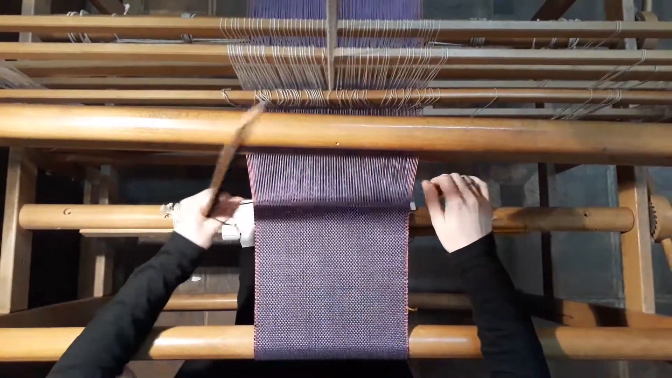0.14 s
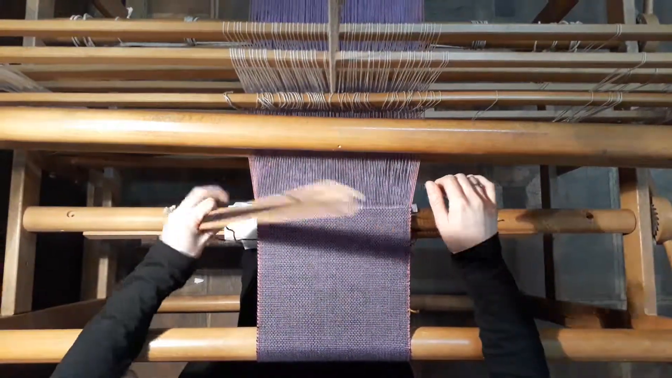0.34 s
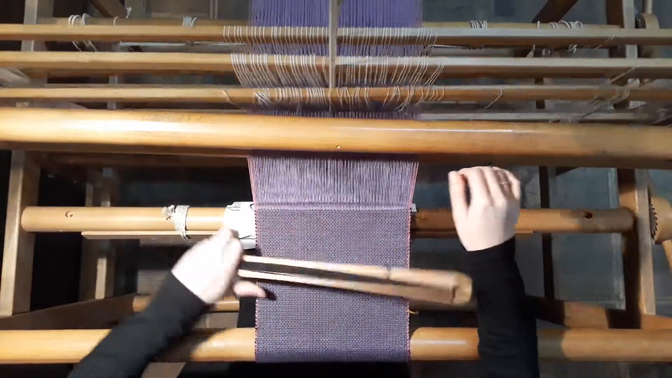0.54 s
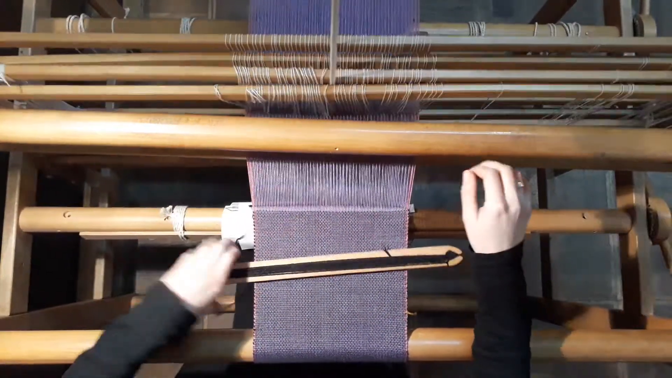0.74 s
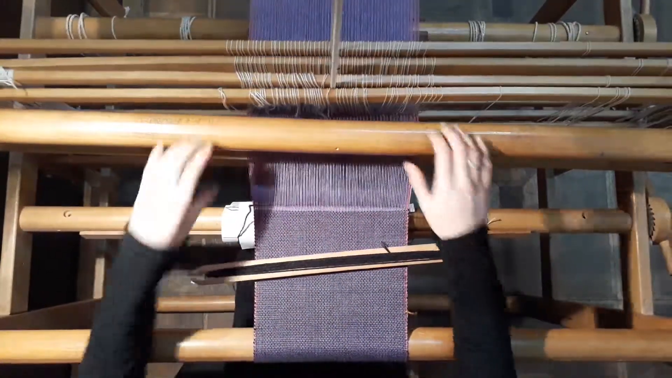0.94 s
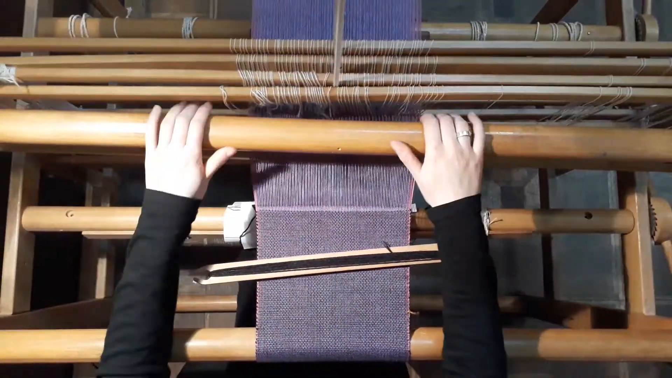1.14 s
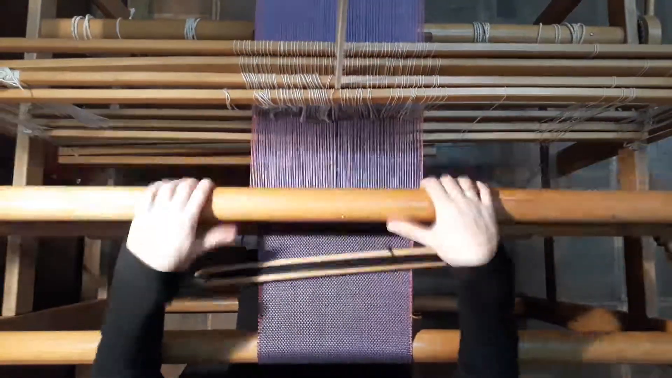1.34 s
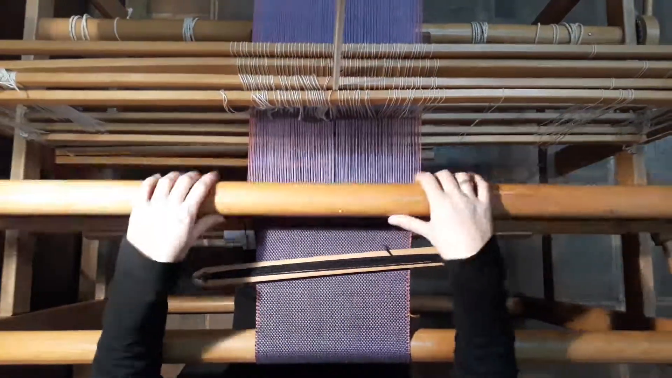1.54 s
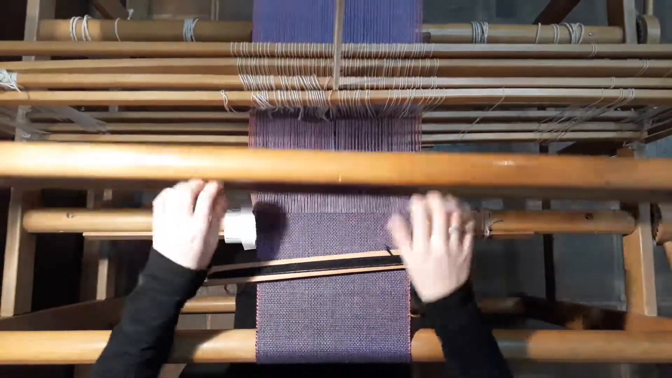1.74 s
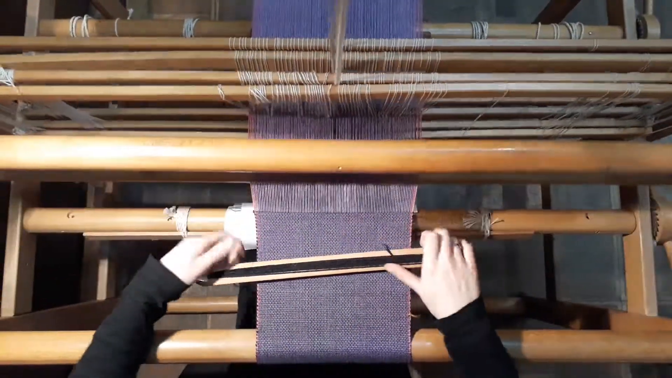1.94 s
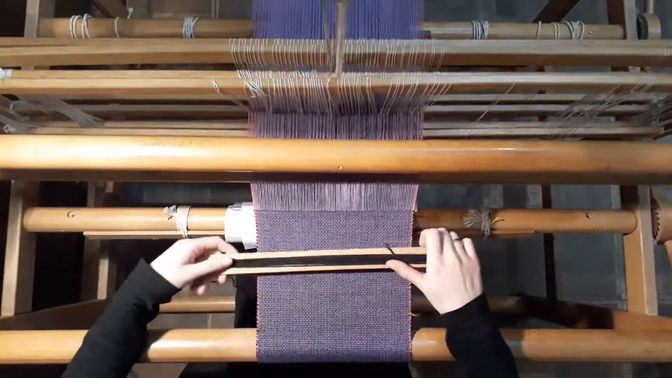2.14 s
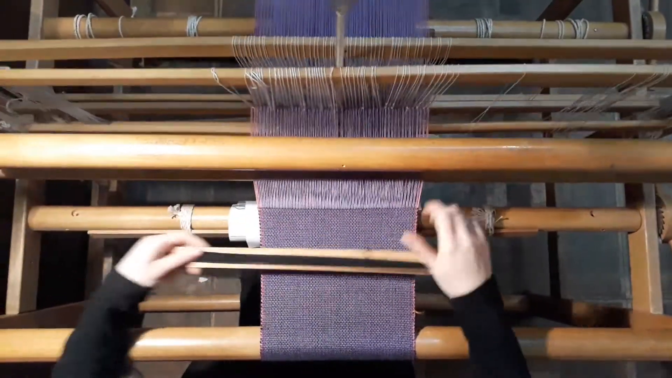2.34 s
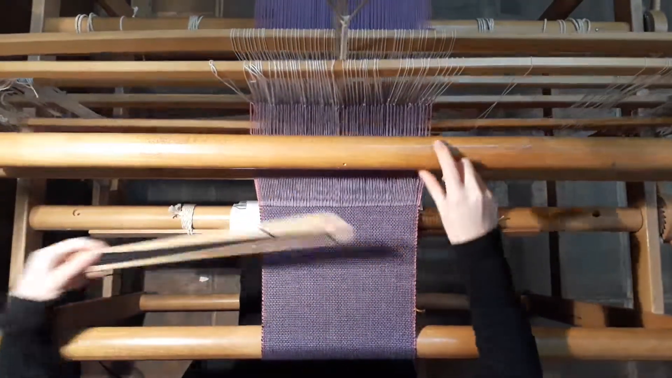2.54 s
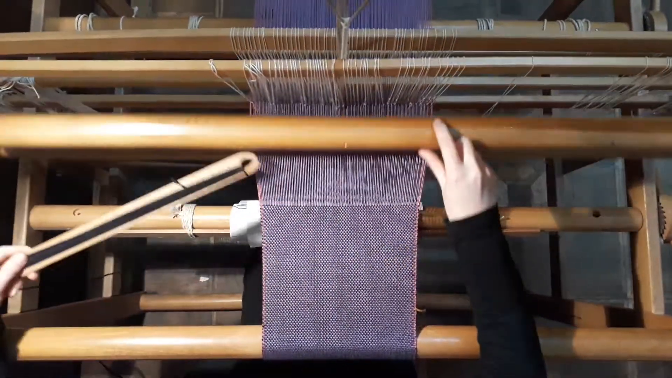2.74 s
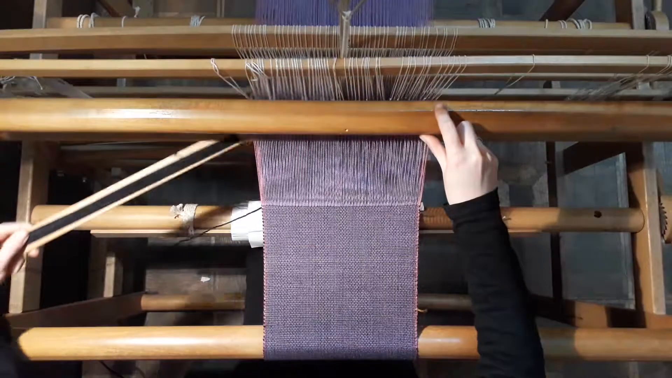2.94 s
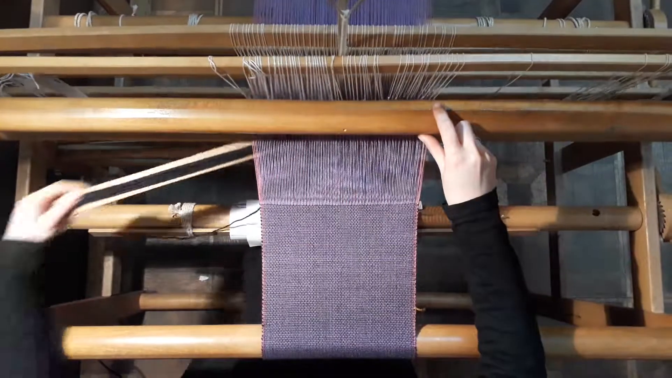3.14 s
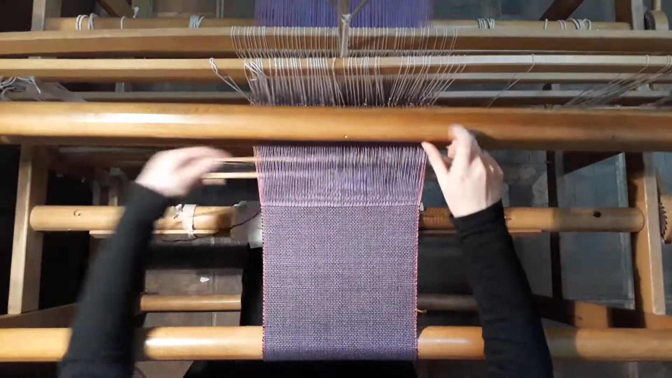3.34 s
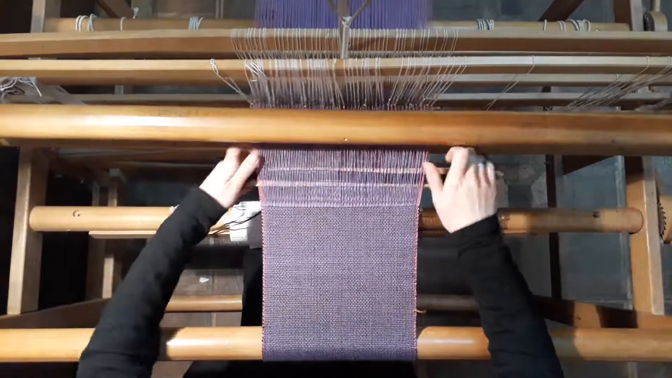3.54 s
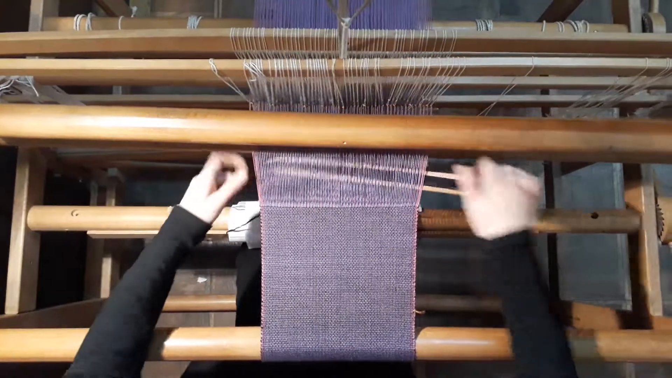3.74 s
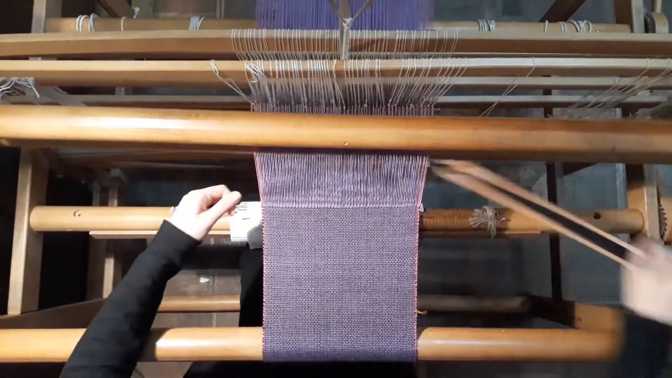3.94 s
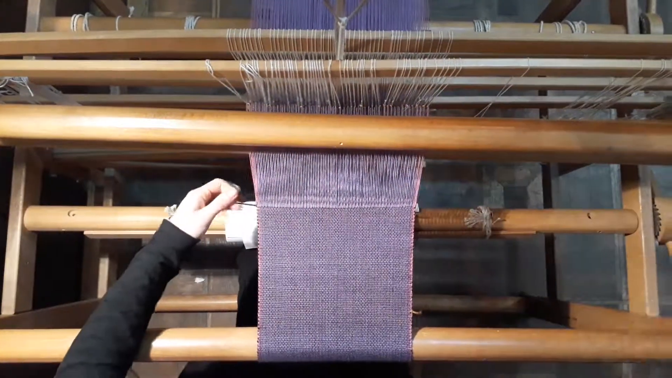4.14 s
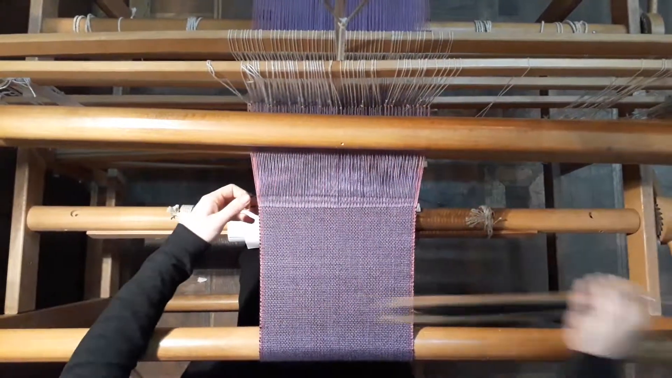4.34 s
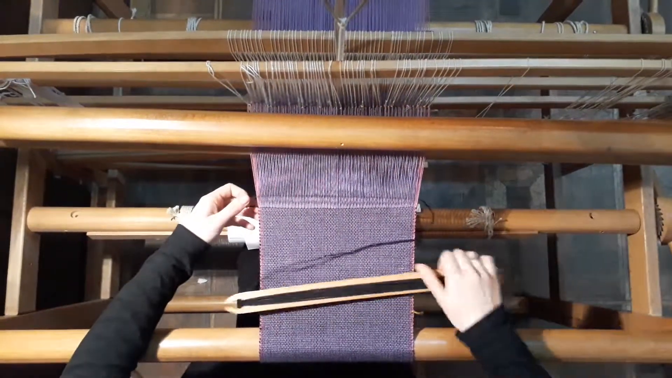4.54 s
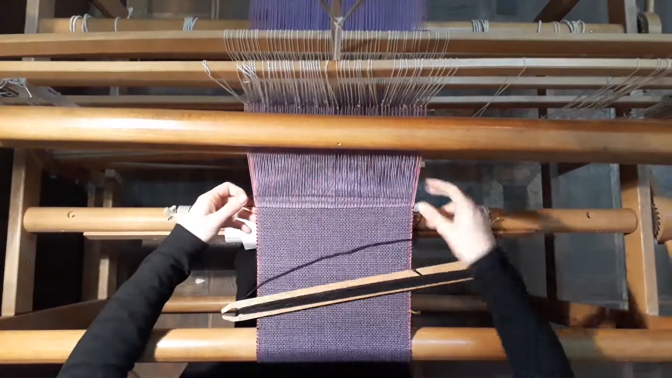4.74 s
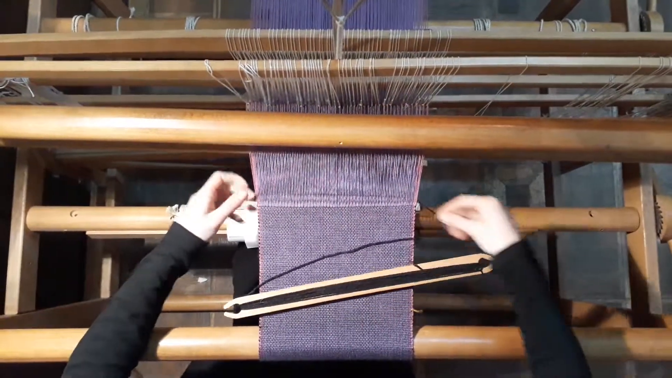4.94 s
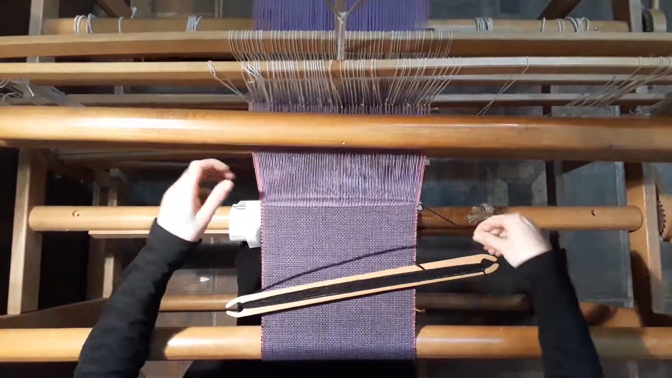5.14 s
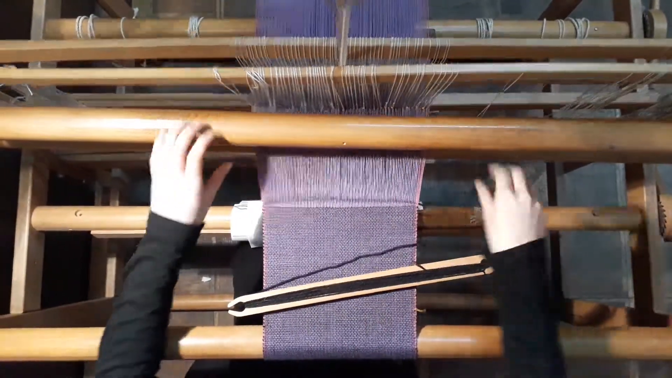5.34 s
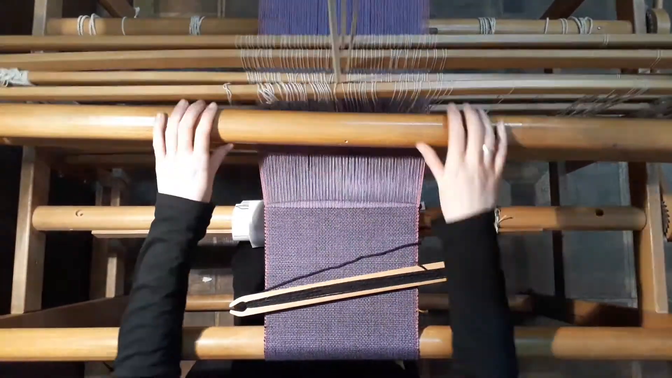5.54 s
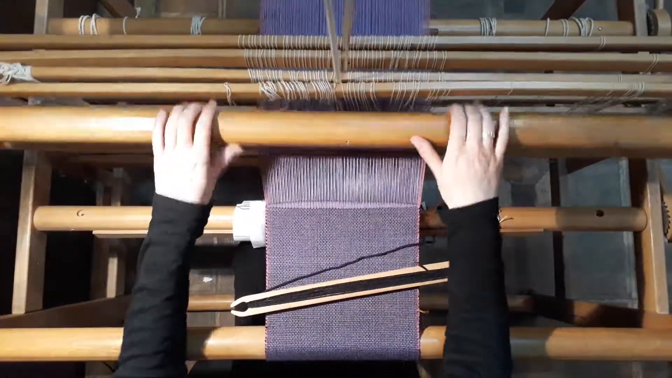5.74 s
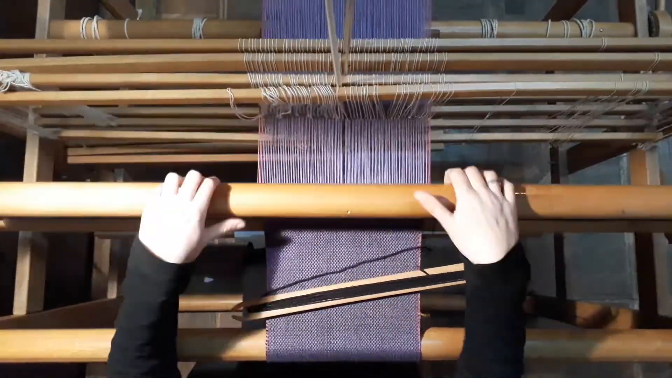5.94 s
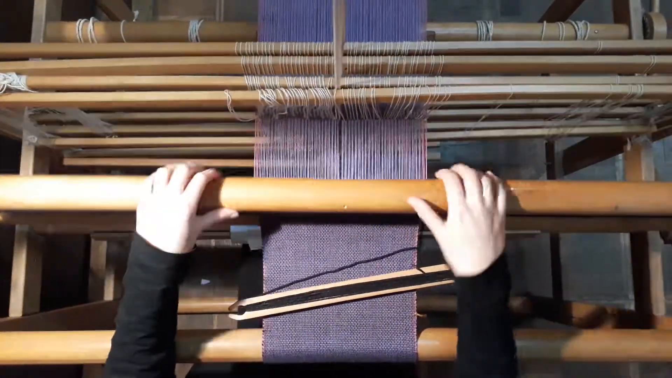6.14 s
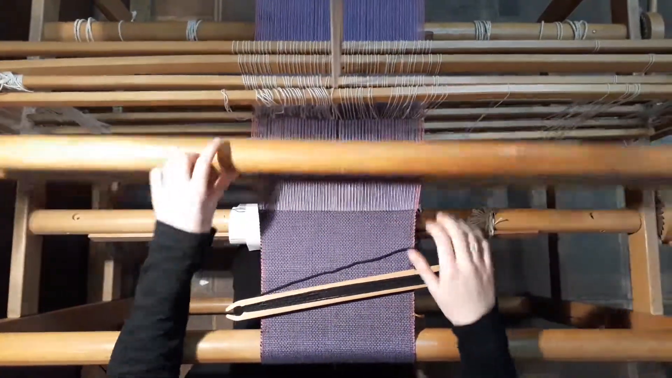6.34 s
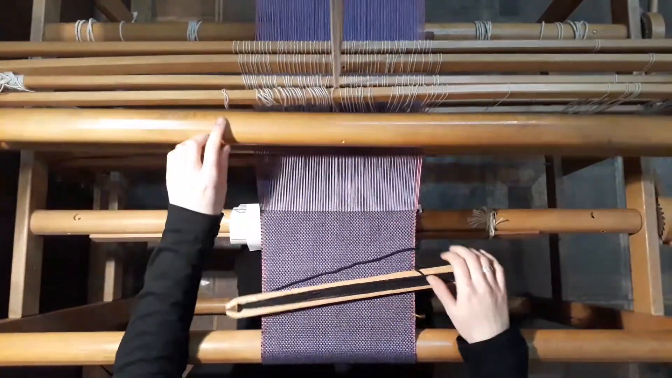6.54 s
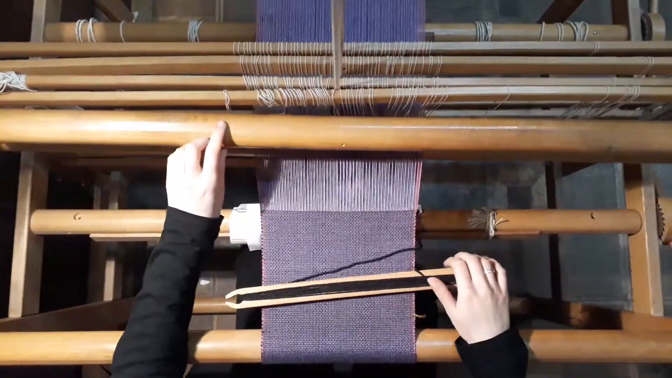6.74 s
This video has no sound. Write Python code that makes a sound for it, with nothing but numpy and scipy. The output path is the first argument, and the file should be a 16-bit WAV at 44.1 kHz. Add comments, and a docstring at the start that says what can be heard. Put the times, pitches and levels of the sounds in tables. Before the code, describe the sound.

A wooden floor loom is worked by hand, heard from just above the cloth in a bare room with a short echo. Around 0.5 seconds a stick shuttle ticks and scrapes over the threads, then the hanging shafts knock and rattle. At 1.4 seconds the beater scrapes along the warp and hits with a sharp crack and a low boom. More bright wooden knocks follow at 2 seconds. From 2.3 to 5.2 seconds it is quieter: the shuttle taps and slides, yarn rustles, the timber groans faintly at 3 seconds, and the shuttle lands on the cloth with a soft, dull slap at 4.5. From 5.4 seconds the shafts clatter loudly over a faint low grumble. The second beater stroke scrapes, cracks and booms at 6 seconds, and lighter knocks and rattles continue until about 6.8.

```python
"""A wooden floor loom weaving two picks by hand, the microphones just above the cloth in a bare room.
Twice the beater is pulled in: the reed scrapes along the threads, packs the weft, and the frame booms.
The treadles shift the hanging shafts, whose bars knock and rattle, and the loaded timber grumbles.
Close up, a stick shuttle taps and slides through the warp and is laid on the cloth with a soft slap."""
import sys
import numpy as np
from scipy import signal
from scipy.fft import rfft, irfft, next_fast_len
from scipy.io import wavfile
from scipy.ndimage import uniform_filter1d

SR = 44100
rng = np.random.default_rng(int(sys.argv[2]) if len(sys.argv) > 2 else 0)


def dump(signal):
    """Clip the signal to [-1, 1] and save it as 16-bit WAV at the path in sys.argv[1]."""
    limited = np.clip(np.atleast_2d(signal).T, -1, 1)
    pcm = np.round(limited * 32767).astype(np.int16)
    wavfile.write(sys.argv[1], SR, pcm)


N = 303408
TIME = np.arange(N) / SR


def amp(db):
    """Decibels to gain."""
    return 10 ** (np.asarray(db) / 20)


def unit(x):
    """Scales to rms 1."""
    return x / np.sqrt(np.mean(x ** 2) + 1e-20)


def at_peak(sound, db, window=88):
    """Scales a blow so that its loudest window of samples has this level."""
    return sound * amp(db) / np.sqrt(uniform_filter1d((sound ** 2).mean(0), window).max())


def panned(pan_db):
    """Left and right gains; positive pan_db leans left."""
    return amp(np.array([[pan_db], [-pan_db]]) / 2)


def add(mix, start_s, sound):
    """Mixes a stereo sound in at start_s."""
    part = mix[:, max(round(start_s * SR), 0):][:, :sound.shape[1]]
    part += sound[:, :part.shape[1]]


def read(points, hz):
    """Reads a table on a log-frequency axis."""
    f, value = np.transpose(points)
    return np.interp(np.log(hz + 1), np.log(f + 1), value)


def colour(x, db_at):
    """Filters by a function that gives dB for each frequency."""
    n = x.shape[-1]
    size = next_fast_len(n + 4096)
    return irfft(rfft(x, size) * amp(db_at(np.fft.rfftfreq(size, 1 / SR))), size)[..., :n]


def shaped(x, spectrum):
    """Filters x by a spectrum table, at rms 1."""
    return unit(colour(x, lambda f: read(spectrum, f)))


def hump(x, hz, below_db, above_db):
    """Filters by a broad hill around hz, its slopes in dB per octave."""
    def db_at(f):
        octaves = np.log2((f + 1) / hz)
        return -np.where(octaves < 0, below_db, above_db) * (np.sqrt(octaves ** 2 + .5) - np.sqrt(.5))
    return colour(x, db_at)


def swell(start_s, hold_s, db, rise_db_per_s, fall_db_per_s):
    """Gain over time: rises until start_s, holds, then dies away."""
    early, late = np.maximum(start_s - TIME, 0), np.maximum(TIME - start_s - hold_s, 0)
    return amp(db - rise_db_per_s * early - fall_db_per_s * late)


def together(gains):
    """Overlapping gestures add in power."""
    return np.sqrt(sum(gain ** 2 for gain in gains))


def swells(rows, rise_db_per_s, fall_db_per_s):
    """Gain over time of events that share one attack and release."""
    return together(swell(*row, rise_db_per_s, fall_db_per_s) for row in rows)


def grains(per_s, spread_db):
    """Random clicks of uneven size."""
    size = amp(spread_db * np.minimum(rng.exponential(1, N), 4))
    return size * rng.choice([-1, 1], N) * (rng.random(N) < per_s / SR)


# how alike a diffuse field is at the two microphones: freq_hz, coherence
COHERENCE = [(30, 1), (130, 0.993), (300, 0.92), (700, 0.6), (1300, 0), (16000, 0.1)]
def diffuse(pair):
    """Two unrelated channels become alike in the bass, as at a closely spaced pair."""
    n = pair.shape[-1]
    a, b = rfft(pair)
    same = np.clip(read(COHERENCE, np.fft.rfftfreq(n, 1 / SR)), 0, 1)
    mid, side = a * np.sqrt((1 + same) / 2), b * np.sqrt((1 - same) / 2)
    return irfft(np.array([mid + side, mid - side]), n)


def noise(n=N):
    """White noise reaching the pair from all sides."""
    return diffuse(rng.standard_normal((2, n)))


CONTACT_RISE_S = .0007
def contact(t, fade_s):
    """The dense, quickly damped crack at the point of impact."""
    return noise(len(t)) * np.exp(-t / fade_s) * (1 - np.exp(-t / CONTACT_RISE_S))


def ring(modes, t, detune):
    """One blow on a set of modes; each piece of wood is tuned a little differently."""
    hz, db, t60 = np.transpose(modes)[:, :, None]
    hz = hz * (1 + detune * rng.standard_normal(hz.shape))
    # the place of the blow decides how strongly each mode speaks
    strike = rng.uniform(0.71, 1, len(modes)) * np.exp(2j * np.pi * rng.random((2, len(modes))))
    partials = amp(db) * np.exp((2j * np.pi * hz - np.log(1000) / t60) * t)
    return (strike @ partials).real / np.linalg.norm(amp(db))


# decay of the bare room: freq_hz, t60_s
ROOM_DECAY = [(100, 0.68), (500, 0.67), (1400, 0.61), (3700, 0.56), (9000, 0.41), (16000, 0.26)]
def room(x, wet_db):
    """The diffuse echo off walls and floor, the treble dying first."""
    hz, t, bands = signal.stft(noise(SR), SR, nperseg=256)
    decay = np.exp(-np.log(1000) * t / read(ROOM_DECAY, hz)[:, None])
    tail = signal.istft(bands * decay, SR, nperseg=256)[1][:, :SR]
    tail *= 1 - np.exp(-(TIME[:SR] / 0.0016) ** 2)
    return amp(wet_db) * signal.fftconvolve(x, tail / np.linalg.norm(tail[0]), axes=1)[:, :N]


# room tone: freq_hz, relative_db
AIR_SPECTRUM = [(20, -20), (120, 7), (190, -7), (500, -17), (1000, -20.5), (4500, -27), (8000, -18),
                (10000, -23), (16000, -23)]
def room_tone(level_db=-59.5):
    """Faint low rumble and hiss all around the loom."""
    return amp(level_db) * shaped(noise(), AIR_SPECTRUM)


# the timber groans as the shuttle is pushed through and the yarn drawn tight: start_s, hold_s, level_db
GROAN_SWELLS = [(3.03, 0.11, -51), (5.14, 0.14, -61.5)]
def groans(pitch_hz=134, waver=0.066):
    """Wood rubbing on wood keeps one low note of the frame sounding, unsteady in pitch."""
    drift = unit(uniform_filter1d(rng.standard_normal(N), size=2000))
    note = unit(np.sin(2 * np.pi * np.cumsum(pitch_hz * (1 + waver * drift)) / SR))
    return swells(GROAN_SWELLS, rise_db_per_s=70, fall_db_per_s=42) * note


def resonance(x, hz, width_hz):
    """A resonance that follows the curve hz, with steep skirts."""
    turn = np.exp(2j * np.pi * np.cumsum(hz) / SR)
    pole = np.exp(-np.pi * width_hz / SR)
    return unit((turn * signal.lfilter([1], np.poly([pole, pole]), x / turn)).real)


# wood dragged over threads: start_s, length_s, level_db, first_hz, last_hz, width_hz
SHUTTLE_DRAGS = [(0.511, 0.23, -50, 960, 2380, 1880), (2.305, 0.44, -58, 825, 654, 950),
                 (3.363, 0.08, -53, 1100, 1000, 500), (2.95, .36, -59.5, 2520, 3150, 700)]
def shuttle_drags():
    """The shuttle skips from thread to thread; its ring glides as the free end changes length."""
    out = np.zeros((2, N))
    for start_s, length_s, db, first_hz, last_hz, width_hz in SHUTTLE_DRAGS:
        n = round(length_s * SR)
        skips = np.array([grains(per_s=350, spread_db=2.5)[:n] for _ in range(2)])
        scrape = diffuse(resonance(skips, np.linspace(first_hz, last_hz, n), width_hz))
        add(out, start_s, amp(db) * scrape * signal.windows.tukey(n, .5) * panned(2))
    return out + room(out, wet_db=-5)


# the taut cloth and its beam, just under the microphones: pitch_hz, relative_db, t60_s
CLOTH_MODES = [(92, 5, 0.17), (140, -6, 0.22), (300, 0, 0.08)]
def cloth_slap(start_s=4.55, level_db=-37.5, attack_s=0.0074):
    """The shuttle is laid down with a soft slap, and the cloth answers like a slack drum."""
    out, t = np.zeros((2, N)), TIME[:SR // 2]
    slap = hump(contact(t, fade_s=.04), hz=230, below_db=14, above_db=36)
    drum = ring(CLOTH_MODES, t, detune=0.0014)[0]
    bump = at_peak(np.array([drum, drum]), 0, window=400) + at_peak(slap, -7, window=400)
    bump *= 1 - np.exp(-t / attack_s)
    add(out, start_s, at_peak(bump, level_db, window=400))
    return out + room(out, wet_db=-6)


# rubbed yarn at close range: freq_hz, relative_db
YARN_SPECTRUM = [(400, -9), (1200, -13), (2500, -6.5), (4500, 0.5), (8000, 1), (10500, 1), (15500, -7.5)]
def rubbing(per_s, spread_db, release_s=0.011):
    """Fibres catch and let go in a fine crackle."""
    catches = signal.lfilter([1], [1, -np.exp(-1 / (release_s * SR))], grains(per_s, spread_db) ** 2)
    return shaped(np.sqrt(catches) * rng.standard_normal((2, N)), YARN_SPECTRUM)


# yarn, shuttle or reed drawn over the warp, to the right: fastest_s, run_up_s, run_out_s, level_db
WARP_SLIDES = [(.65, 0.22, 0.38, -44.5), (1.35, 0.16, 0.14, -44.5), (2.198, 0.59, 0.49, -42),
               (3.28, 1, 1, -54), (3.775, 0.54, 0.23, -46.5), (4.185, 0.083, 0.052, -51.5),
               (5.16, 0.16, 0.15, -73), (5.43, 0.47, 0.27, -44.5), (5.95, 0.19, 0.14, -37.5),
               (6.62, 1, 0.26, -55.5)]
def warp_slides(range_db=20, idle_db=-66, idle_s=1.0):
    """The taut threads are brushed, faintly at first, then louder with the speed of each pull."""
    pulls = [swell(fastest_s, 0, db, range_db / up_s, range_db / out_s)
             for fastest_s, up_s, out_s, db in WARP_SLIDES]
    speed = together(pulls + [amp(idle_db) * (TIME < idle_s)])
    out = speed * rubbing(per_s=1700, spread_db=6) * panned(-8)
    return out + room(out, wet_db=-6)


# a foot holds a treadle down, below the cloth: start_s, hold_s, level_db
TREADLE_HOLDS = [(.85, 0.068, -46), (1.85, 1.1, -54.5), (5.6, 1.2, -52)]
# timber under load: freq_hz, relative_db
GRUMBLE_SPECTRUM = [(25, -15.5), (60, -6), (95, -12.5), (122, 9.5), (145, -8), (175, -5), (230, -7),
                    (400, -13), (1000, -32.5)]
def treadle_strain(rest_db=-66.5):
    """The heavy frame grumbles, louder while the weaver's foot loads it."""
    load = together([swells(TREADLE_HOLDS, rise_db_per_s=73.5, fall_db_per_s=55.5), amp(rest_db)])
    return load * shaped(noise(), GRUMBLE_SPECTRUM)


# ticks close to the microphones: start_s, level_db, brightness_hz, pan_db, body_db
SHUTTLE_TAPS = [(0.465, -37, 9100, -5, -26), (0.483, -37, 3880, -3, -22), (0.712, -35.5, 4030, -5, -30),
                (1.116, -34, 8800, -1, -27), (1.185, -30.5, 6500, -5, -14.5), (1.208, -32.5, 3100, -3, -39),
                (1.46, -16.5, 6800, 1, -29), (1.55, -22, 11200, 0, -37), (1.733, -36, 3500, 0, -17),
                (1.759, -34.5, 3600, -1, -19.5), (1.805, -38.5, 3220, 1, -18.5),
                (2.308, -44.5, 1370, 0, -4.5), (2.436, -44.5, 930, 2, -1), (2.467, -35, 3740, -3, -30),
                (2.512, -20, 4740, -1.5, -36), (2.779, -30.5, 3770, -1, -21), (2.789, -33.5, 3400, -4, -9),
                (3.209, -38.5, 8200, -7, -15.5), (3.348, -36.5, 8150, -6, -11.5),
                (3.493, -39.5, 7700, -2, -10.5), (3.54, -29, 6340, -2, -28), (3.612, -36.5, 3100, 1.5, -20),
                (3.805, -30, 6530, -2.5, -28.5), (4.034, -35, 8460, -6, -15.5),
                (4.738, -39.5, 8900, -6.5, -14.5), (5.038, -33.5, 6000, 0.5, -25),
                (5.101, -28, 6100, -1.5, -46), (5.134, -35.5, 4470, 0, -20.5), (5.948, -27, 8000, -4, -9),
                (5.981, -16, 8300, 2, -35), (6.016, -20.5, 7550, 3, -35), (6.0472, -13.5, 6900, -7, -24),
                (6.145, -25.5, 8600, -1, -26), (6.381, -38.5, 3830, -4, -33),
                (6.448, -32.5, 3740, -2.5, -13.5)]
# the woody body of a tap: freq_hz, relative_db
WOOD_SPECTRUM = [(150, -30), (380, -12.5), (530, -7.5), (1200, -8.5), (4500, -8), (9000, -14.5)]
def shuttle_taps(fade_cycles=17, pan_offset_db=-3):
    """The shuttle taps and threads slip free in dry ticks, the brighter the shorter."""
    out, t = np.zeros((2, N)), TIME[:SR // 5]
    for start_s, db, hz, pan_db, body_db in SHUTTLE_TAPS:
        tick = hump(contact(t, fade_s=min(fade_cycles / hz, .005)), hz, below_db=18, above_db=18)
        tick = at_peak(tick, 0) * panned(pan_db + pan_offset_db)
        body = at_peak(shaped(contact(t, fade_s=0.052), WOOD_SPECTRUM), body_db)
        add(out, start_s, at_peak(tick + body, db))
    out += room(out, wet_db=-4)
    lows = signal.sosfilt(signal.butter(1, 1400, fs=SR, output="sos"), out)
    return out + lows * (panned(4) + 0.5)  # the low woody part is lifted, more on the left


# bending modes of the shaft bars, all of nearly the same length: pitch_hz, relative_db, t60_s
BAR_MODES = [(1195, -5, .17), (1850, -1, .16), (2640, 0, .22), (3520, -2, .14), (4400, -3, .11),
             (5180, -3, .1), (6220, -4, .08), (7100, -4, .07), (8030, -10, .07)]
def bar_contact(t, fade_s, depth_db=6, width_hz=210):
    """A crack among the bars, which lend it broad resonances at their modes."""
    hz = np.transpose(BAR_MODES)[0][:, None]
    return colour(contact(t, fade_s),
                  lambda f: depth_db * (np.exp(-((f - hz) / width_hz) ** 2).max(0) - 1))


def chatter(per_s, spread_db, spectrum, bars):
    """Many small woody collisions, shared among several loose bars."""
    out, t = np.zeros((2, N)), TIME[:SR // 20]
    for _ in range(bars):
        blow = bar_contact(t, fade_s=0.002)
        out += signal.oaconvolve(grains(per_s / bars, spread_db)[None], blow, axes=1)[:, :N]
    return shaped(out, spectrum)


# a treadle or a swing of the beater shakes the shafts: start_s, hold_s, level_db
SHAFT_JOSTLES = [(.855, 0.021, -37.5), (.99, 0.029, -36), (1.85, 0.013, -35), (2.25, 0.53, -55.5),
                 (5.415, 0.1, -39), (5.575, 0.078, -28.5), (5.925, .02, -38), (6.14, 0.024, -40),
                 (6.53, 0.14, -46.5)]
# their rattle: freq_hz, relative_db
RATTLE_SPECTRUM = [(100, -37.5), (220, -0.5), (450, -8), (650, -2), (2400, -1), (4500, -6.5), (6000, -28),
                   (12000, -36)]
def shaft_rattle():
    """The loosely hanging bars rattle and settle."""
    shaking = swells(SHAFT_JOSTLES, rise_db_per_s=378.5, fall_db_per_s=97.5)
    out = shaking * chatter(per_s=300, spread_db=3, spectrum=RATTLE_SPECTRUM, bars=8)
    return out + room(out, wet_db=-2)


# bar strikes bar, and at 1.46 s and 6.018 s the reed knocks in the beater: start_s, level_db, brightness_hz,
# pan_db, ring_db, note_db, note_hz
BAR_KNOCKS = [(0.716, -32.5, 1970, 2, 1, -0.5, 1956), (.767, -29.5, 1660, 1, -9, -1, 1920),
              (0.789, -24, 3920, -7.5, -8, -5, 3605), (0.797, -29.5, 1840, 4, -19, -6, 1230),
              (.848, -25.5, 1700, 0, -29, -14, 2840), (.881, -24, 2670, -1, -12.5, -9, 1923),
              (.977, -19, 5180, -6.5, -5.5, -13, 1213), (1.072, -33.5, 2480, 5, -4, -10, 1196),
              (1.368, -26.5, 3530, -7, -19, -25, 3620), (1.411, -20.5, 2510, -7, -14, -14, 2720),
              (1.46, -25, 765, 4.5, -12, -10, 1172), (1.836, -25, 2520, -3, -7, -5.5, 3534),
              (1.986, -18.5, 5700, -10.5, 1.5, -3.5, 7040), (1.994, -18.5, 3460, 1.5, 3, -5.5, 2590),
              (5.402, -35.5, 2580, -1, 7, -4.5, 2700), (5.488, -33.5, 2270, -8, -9, -8, 2680),
              (5.555, -24.5, 3400, 14, -25, -13, 1750), (5.558, -19, 3970, -13.5, -23, -1, 4655),
              (5.604, -11.5, 5450, -5.5, -27, -10, 6420), (5.615, -17.5, 2900, -1, -19, -3.5, 3150),
              (5.962, -19, 2320, -2, -10, -29, 1765), (5.983, -18.5, 1940, -3, -5.5, -5, 1194),
              (6.018, -26, 785, 0.5, -10, -13, 835), (6.138, -20.5, 2700, -2.5, 4.5, -11, 2716),
              (6.313, -40.5, 2600, 0, 7, 15, 2640), (6.52, -33, 3550, -5, -18, -14, 2510),
              (6.625, -30.5, 3580, -5, -23, -8, 3830), (6.707, -29, 2460, -4, -19, -13, 1890)]
def bar_knocks(ring_offset_db=-4, crack_cycles=24, note_cycles=150, crossfeed=0.13):
    """A woody crack, shorter the brighter it is; a note from the spot struck; nearby bars ringing."""
    out, t = np.zeros((2, N)), TIME[:SR // 2]
    for start_s, db, hz, pan_db, ring_db, note_db, note_hz in BAR_KNOCKS:
        crack = hump(bar_contact(t, fade_s=crack_cycles / hz), hz, below_db=4.5, above_db=22)
        note_t60_s = min(note_cycles / note_hz, .07)
        note = np.sin(2 * np.pi * note_hz * t) * np.exp(-np.log(1000) * t / note_t60_s)
        note *= 1 - np.exp(-t / CONTACT_RISE_S)
        neighbours = sum(ring(BAR_MODES, t, detune=.02) for _ in range(5))
        ringing = at_peak(hump(neighbours, hz, below_db=5, above_db=12), ring_db + ring_offset_db)
        blow = at_peak(crack, 0) + at_peak(np.array([note, note]), note_db) + ringing
        add(out, start_s, at_peak(blow, db) * panned(pan_db))
    spread = (1 - crossfeed) * out + crossfeed * out[::-1]  # the echo reaches both sides more evenly
    return out + room(spread, wet_db=0.5)


# dull blows from beater and treadles: start_s, level_db, pitch_hz, ring_db
FRAME_THUMPS = [(1.371, -25.5, 115.5, -22), (1.44, -18.5, 226.3, -18), (1.442, -14, 119.4, -22),
                (2.788, -46, 117, -9), (5.615, -35.5, 112, -7), (5.936, -27, 108, -24),
                (6.002, -19, 109.8, -23), (6.005, -25.5, 233, -6), (6.139, -47, 131, -12)]
# modes of the heavy frame: pitch_hz, relative_db, t60_s
FRAME_MODES = [(117, -6.5, .2), (140, -1, .16), (189, -6, .2), (250, -2, 0.27), (300, -3, .22)]
def frame_thumps(gain_db=-3, attack_s=0.0062, fade_s=0.039):
    """A soft heavy blow swings the beam it lands on and sets the frame booming."""
    out, t = np.zeros((2, N)), TIME[:SR * 3 // 4]
    for start_s, db, hz, ring_db in FRAME_THUMPS:
        thud = at_peak(hump(contact(t, fade_s), hz, below_db=50, above_db=39.5), -5, window=400)
        swing = np.sin(2 * np.pi * hz * t) * np.exp(-t / fade_s)
        ringing = amp(ring_db) * ring(FRAME_MODES, t, detune=0.0041)[0]
        boom = (thud + swing + ringing) * (1 - np.exp(-t / attack_s))
        add(out, start_s, at_peak(boom, db + gain_db, window=400))
    return out + room(out, wet_db=-14)


# the reed pushes the weft home: start_s, packed_s, strength_db
BEATER_STROKES = [(1.369, 1.461, 1), (5.928, 6.018, 0)]
def pressure(build_db, rise_db_per_s, fall_db_per_s):
    """Each stroke presses harder by build_db until the weft is packed, then lets go."""
    strokes = []
    for start_s, packed_s, db in BEATER_STROKES:
        build = amp(np.interp(TIME, [start_s, packed_s], [-build_db, 0]))
        strokes.append(build * swell(start_s, packed_s - start_s, db, rise_db_per_s, fall_db_per_s))
    return together(strokes)


# the reed's clatter and the frame's shudder, from above the cloth: freq_hz, relative_db
CLATTER_SPECTRUM = [(100, -45.5), (280, -12), (540, -13), (650, -7), (820, -8), (930, -15), (2600, -8.5),
                    (5000, -20), (8000, -40), (12000, -54.5)]
SHUDDER_SPECTRUM = [(25, -27.5), (50, -15), (80, -16.5), (118, 0), (170, -17.5), (235, -12.5), (330, -26.5),
                    (600, -30.5), (1200, -59.5)]
def beater(clatter_db=-22.5, scrape_db=-29, shudder_db=-27):
    """The reed chatters in its slot and combs the warp while the frame shudders."""
    clatter = amp(clatter_db) * chatter(per_s=2600, spread_db=5, spectrum=CLATTER_SPECTRUM, bars=10)
    scrape = amp(scrape_db) * rubbing(per_s=12000, spread_db=19) * panned(-5)
    shudder = amp(shudder_db) * shaped(noise(), SHUDDER_SPECTRUM)
    out = clatter * pressure(build_db=11.5, rise_db_per_s=602, fall_db_per_s=150.5)
    out += scrape * pressure(build_db=9.5, rise_db_per_s=253, fall_db_per_s=256.5)
    out += shudder * pressure(build_db=13.5, rise_db_per_s=1299.5, fall_db_per_s=154)
    return out + room(out, wet_db=-5)


def scene():
    """The loom at close range over the tone of the bare room."""
    air = room_tone()
    blows = bar_knocks() + shuttle_taps() + frame_thumps() + cloth_slap()
    movement = shuttle_drags() + groans() + beater() + shaft_rattle() + treadle_strain() + warp_slides()
    return air + blows + movement


# response of the microphone ports: freq_hz, gain_db
MIC_RESPONSE = [(30, -8.5), (3500, -6.5), (5100, -6.5), (5700, -15), (6300, -10), (8200, -3.5),
                (9300, -8.5), (16000, -10.5)]
def record(dry, low_cut_hz=42, high_cut_hz=16300):
    """Colour and bass roll-off of the microphone ports, then the band limit."""
    heard = colour(dry, lambda f: read(MIC_RESPONSE, f))
    heard = signal.sosfilt(signal.butter(2, low_cut_hz, "high", fs=SR, output="sos"), heard)
    band_limit = signal.firwin(511, high_cut_hz, window=("kaiser", 9), fs=SR)
    return signal.oaconvolve(heard, band_limit[None], "same")


dry = scene()
out = record(dry)
dump(out)
```